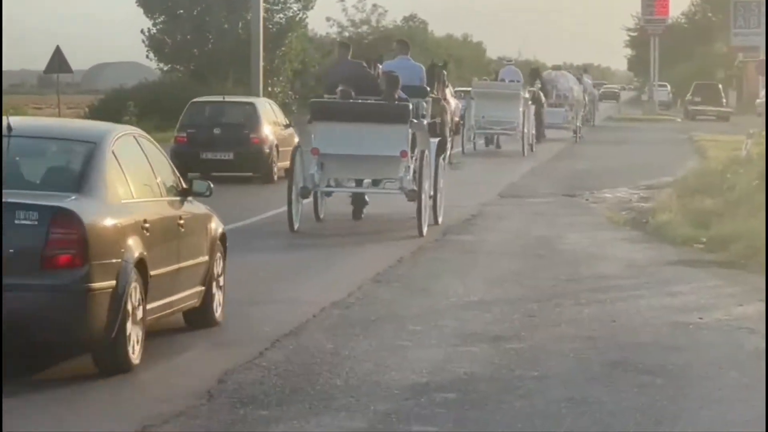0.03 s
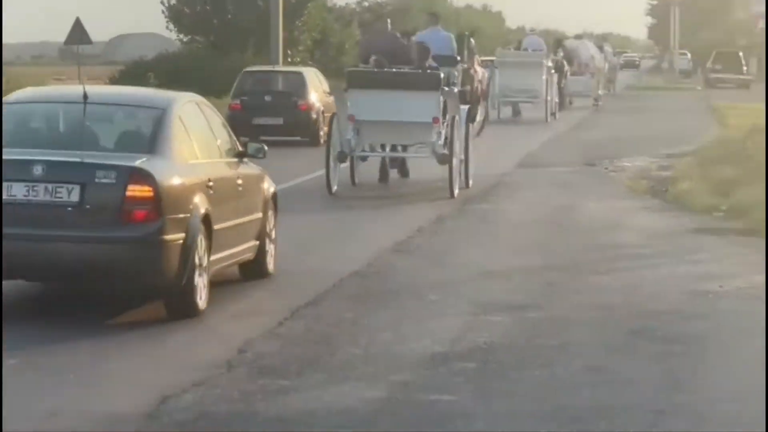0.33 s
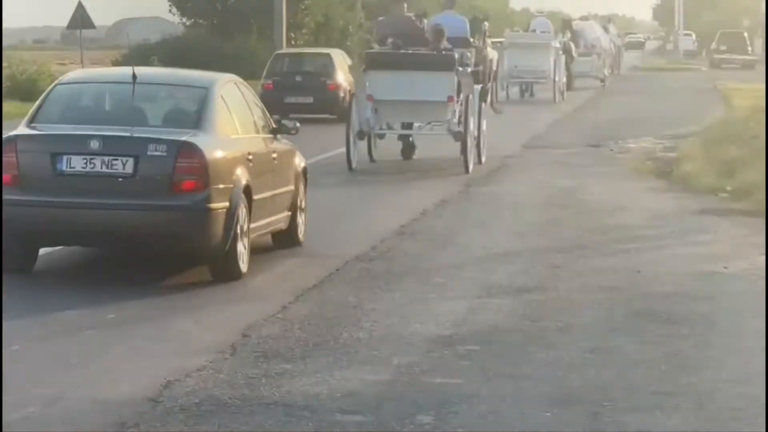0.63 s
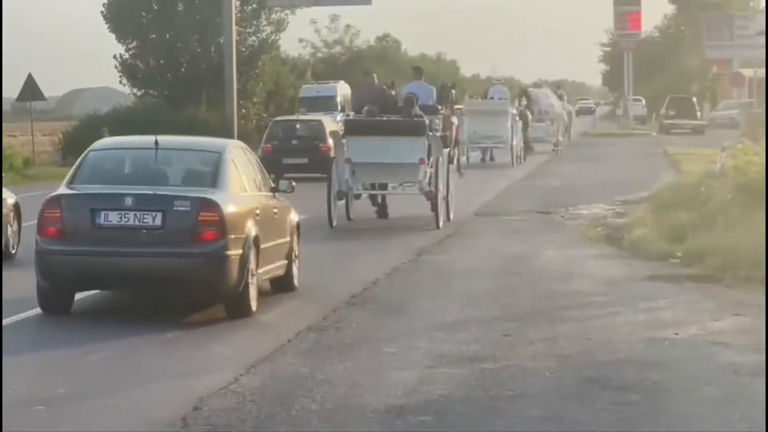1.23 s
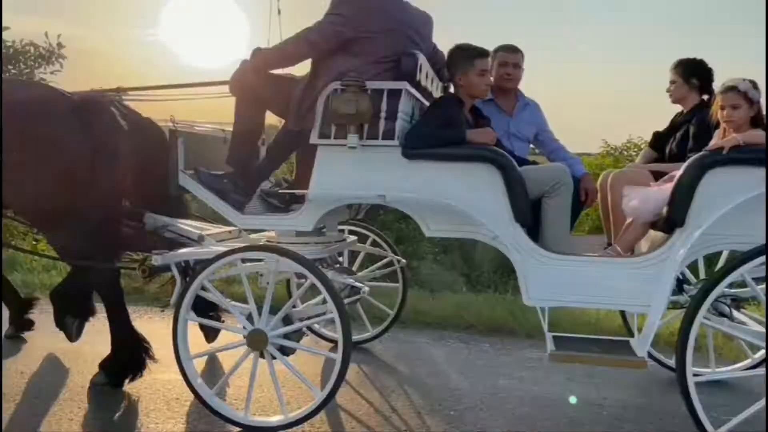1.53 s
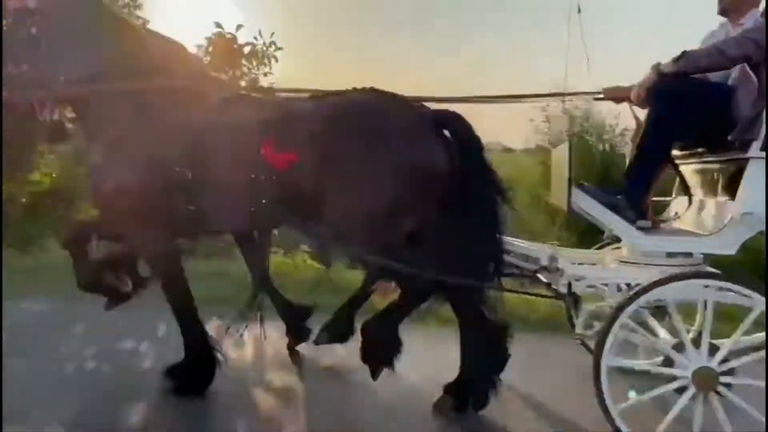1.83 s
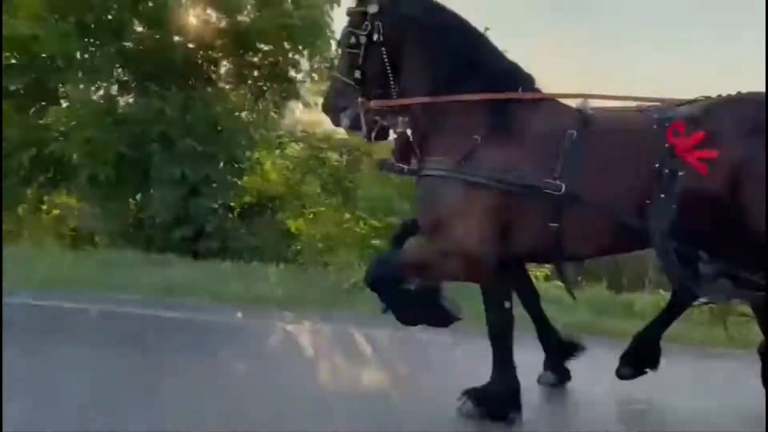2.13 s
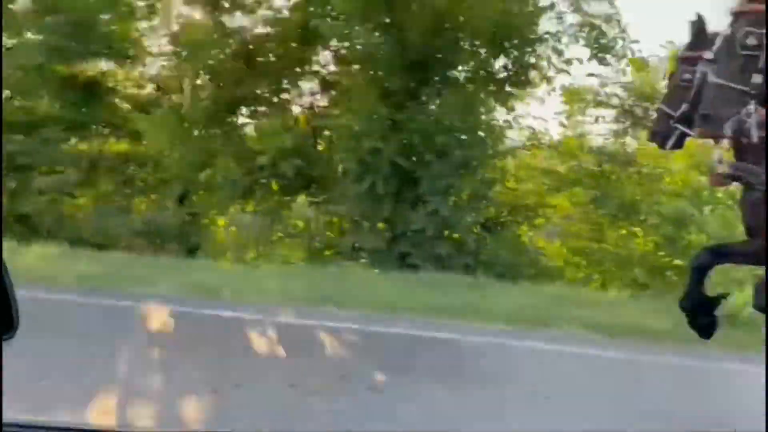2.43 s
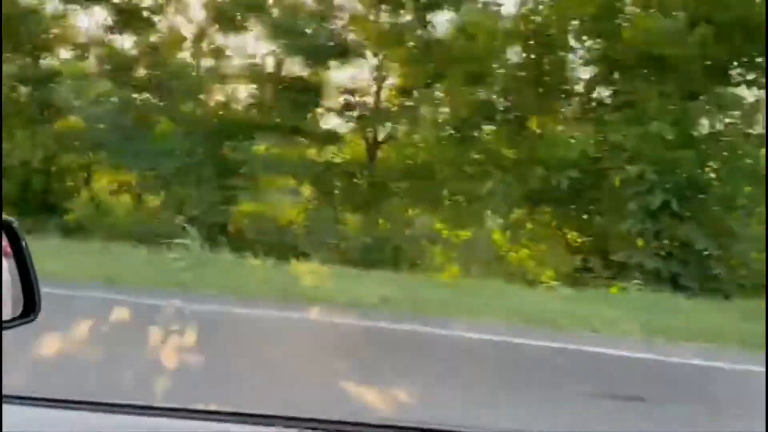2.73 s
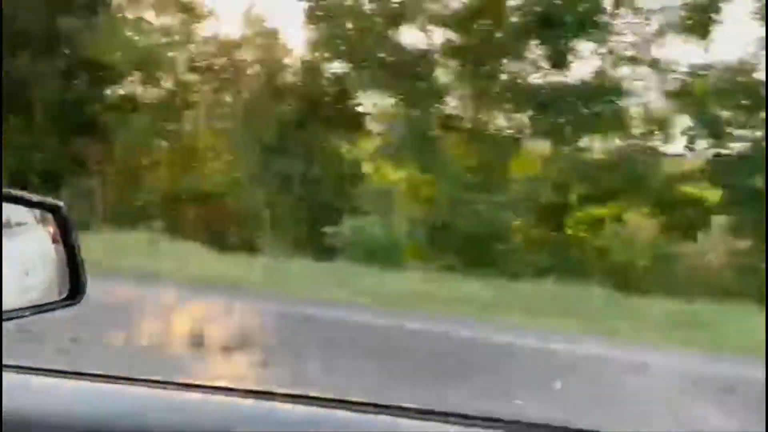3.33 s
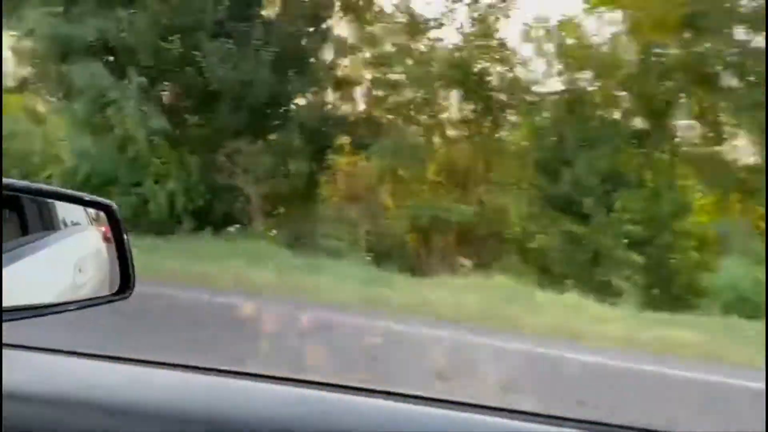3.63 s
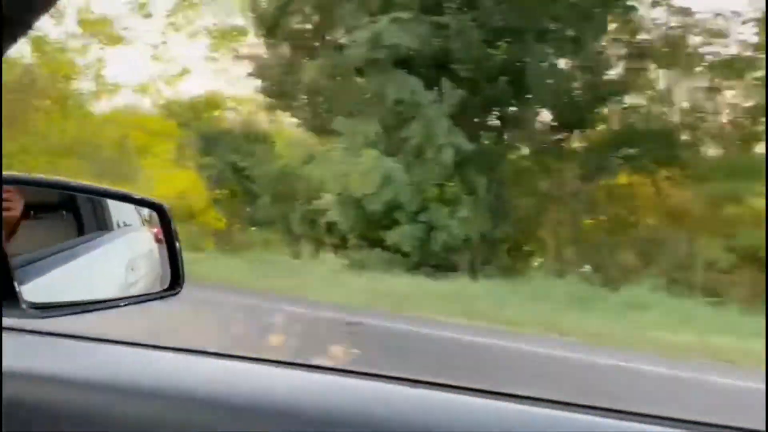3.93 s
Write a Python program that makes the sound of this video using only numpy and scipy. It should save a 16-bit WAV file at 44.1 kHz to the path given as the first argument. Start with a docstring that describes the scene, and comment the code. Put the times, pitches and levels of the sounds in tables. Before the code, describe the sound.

A horse's hooves clop past, heard over road and wind noise inside a moving car.

```python
"""Overtaking a carriage horse

Stereo microphones in a moving car, window open: tyre and wind noise over a booming cabin, horses far ahead.
After a short silent break the car passes a trotting horse, close on the left: hollow hooves clop, iron shoes
clink and scuff on grit, harness buckles jingle. As the horse drops behind, the car knocks over a road seam
and tyre noise swells once more."""
import sys
import numpy as np
from scipy import signal
from scipy.fft import rfft, irfft, next_fast_len
from scipy.io import wavfile
from scipy.ndimage import uniform_filter1d, map_coordinates

SR = 44100
rng = np.random.default_rng(int(sys.argv[2]) if len(sys.argv) > 2 else 0)


def to_wav(s):
    """Save 16-bit WAV."""
    ch = np.atleast_2d(s).T  # columns
    pcm = np.round(np.clip(ch, -1, 1) * 32767)  # PCM
    wavfile.write(sys.argv[1], SR, pcm.astype(np.int16))


N = 176400

LEFT_RIGHT = np.array([[1], [-1]])
IRON_KNOTS_PER_S = 920  # how fast the phase of a ringing shoe wanders
# wind rumble at the two microphones: (frequency [Hz], likeness [0-1])
RUMBLE_ALIKE = [(60, 1), (250, 0.73)]


def amp(db):
    """Decibels to gain."""
    return 10 ** (np.asarray(db) / 20)


def unit(x):
    """Scale to rms 1."""
    return x / np.sqrt(np.mean(x ** 2) + 1e-20)


def along(points, hz):
    """Read (frequency [Hz], value) points on a log axis."""
    f, v = np.transpose(points)
    return np.interp(np.log(hz + 1), np.log(f + 1), v)


def curve(rows):
    """Read (time [s], value) points at every sample."""
    return np.interp(np.arange(N) / SR, *np.transpose(rows))


def wobble(rate):
    """A smooth random curve, rate knots a second."""
    return map_coordinates(rng.standard_normal(int(N * rate / SR) + 4), [np.arange(N) * rate / SR])


def wander(t, rate):
    """Random drift over the times t, straight between rate knots a second."""
    return map_coordinates(rng.standard_normal(len(t)), [t * rate], order=1)


def filtered(x, response):
    """Filter x by a complex response of frequency."""
    m = next_fast_len(N + SR // 2)
    return irfft(rfft(x, m) * response(np.fft.rfftfreq(m, 1 / SR)), m)[..., :N]


def add(track, s, sound):
    """Mix a sound into a track at time s."""
    part = track[..., max(round(s * SR), 0):][..., :sound.shape[-1]]
    part += sound[..., :part.shape[-1]]


def lead(x, phases):
    """Turn left against right by a phase that depends on frequency."""
    return filtered(x, lambda hz: np.exp(.5j * along(phases, hz) * LEFT_RIGHT))


def rush(colour, alike, patchy_db):
    """Stereo noise of rms 1 with patches of random gain."""
    z = signal.stft(rng.standard_normal((2, N)), nperseg=512)[2]
    patches = uniform_filter1d(rng.standard_normal(z.shape[1:]), size=5, axis=0)
    patches = uniform_filter1d(patches, size=10, axis=1)
    pair = signal.istft(z * amp(patchy_db * unit(patches)), nperseg=512)[1][:, :N]
    turn = lambda hz: np.arccos(np.clip(along(alike, hz), -1, 1)) / 2
    mid, side = filtered(pair, lambda hz: amp(along(colour, hz)) * [np.cos(turn(hz)), np.sin(turn(hz))])
    return unit(np.array([mid + side, mid - side]))


def boom(hz, width_hz, evenness):
    """A cabin resonance driven by turbulence; evenness 0-1 steadies its level."""
    resonance = lambda f: 1 / (1 + ((f - hz) / width_hz) ** 2) * f / (f + hz)
    mid, side = signal.hilbert(filtered(rng.standard_normal((2, N)), resonance))
    steadied = mid.real / np.abs(mid) ** np.clip(evenness, 0, .9)
    return unit(steadied) + amp(-20.5) * unit(side.real) * LEFT_RIGHT


def car_behind():
    """Far behind the carriages: tyres, traffic roar, wind hiss and rumble at the window, cabin boom."""
    # the course of each noise: (time [s], level [dB])
    road_db = [(0, -30), (.15, -33.5), (.45, -31), (.75, -31), (1.05, -30), (1.3, -29.5), (1.52, -29)]
    roar_db = [(0, -51), (.6, -40), (.85, -37.5), (1.05, -33.5), (1.3, -30), (1.52, -36)]
    hiss_db = [(0, -45), (.5, -47.5), (1.52, -46.5)]
    rumble_db = [(0, -35), (.3, -32.5), (.5, -36.5), (.62, -29), (.8, -31.5), (.93, -30.5), (1.05, -28.5),
                 (1.25, -30), (1.52, -35)]
    boom_db = [(0, -29), (.668, -24.5), (.714, -33), (.786, -20.5), (.965, -32.5), (1.028, -23.5),
               (1.35, -34.5), (1.392, -23), (1.52, -28.5)]
    # their spectra: (frequency [Hz], density [dB])
    road_colour = [(150, -26), (320, -3.5), (500, -2), (700, -1), (1030, 1.5), (1500, -9), (2200, -15.5),
                   (3100, -18.5), (4200, -28.5), (7000, -27.5), (9500, -57), (11500, -39)]
    roar_colour = [(100, -20), (220, 0.5), (600, 2.5), (800, -6), (1400, -33), (3000, -71)]
    hiss_colour = [(800, -30), (2800, 0.5), (5000, -2.5), (7000, -3.5), (9000, -9), (11200, -1.5)]
    rumble_colour = [(30, -45.5), (70, 3.5), (100, 1), (130, -5), (160, 5), (190, -3), (240, 2.5),
                     (330, -11), (600, -48)]
    # outside noise at the two microphones: (frequency [Hz], likeness [0-1])
    alike = [(200, 0.95), (900, 0.72), (1400, 0.49), (2200, 1), (4000, 1), (11000, 0.85)]
    road = amp(curve(road_db) + 0.8 + 0.54 * wobble(13.9)) * rush(road_colour, alike, patchy_db=1)
    roar = amp(curve(roar_db)) * rush(roar_colour, alike, patchy_db=-1.5)
    hiss = amp(curve(hiss_db)) * rush(hiss_colour, alike, patchy_db=2.5)
    drone = amp(-6) * boom(hz=164.0, width_hz=22, evenness=0.36)
    rumble = amp(curve(rumble_db)) * (rush(rumble_colour, RUMBLE_ALIKE, patchy_db=2.0) + drone)
    low = amp(curve(boom_db)) * boom(hz=48.44, width_hz=7.3, evenness=1.0)
    return road + roar + hiss + rumble + low


def clinks():
    """An iron shoe meets the road and rings briefly; the point of contact picks an extra ring."""
    # shoe strikes: (time [s], level [dB], t60 [s], contact ring [Hz])
    strikes = [(.012, -32, 0.088, 4230), (1.696, -19.5, 0.023, 5070), (1.722, -22.5, .025, 5300),
               (1.758, -21, 0.032, 4050), (2.0059, -15.5, 0.022, 4200), (2.0658, -16, 0.014, 2380),
               (2.0665, -18.5, 0.015, 5350), (2.1574, -13.5, 0.012, 3000), (2.1588, -26, 0.033, 7800),
               (2.338, -26.5, 0.048, 4160), (2.3944, -17, 0.011, 5100), (2.483, -23, .012, 3560),
               (2.7213, -21, 0.013, 4860), (2.7255, -24, 0.015, 7120)]
    # modes of the shoe: (frequency [Hz], level [dB])
    shoe = [(2450, -7), (3900, -6), (5250, -13), (6600, -16), (7900, 3)]
    out, t = np.zeros(N), np.arange(SR // 6) / SR
    tone = lambda hz: np.sin(2 * np.pi * hz * t + 0.8 * wander(t, IRON_KNOTS_PER_S))
    attack = 1 - np.exp(-t / 0.00039)
    for s, db, t60, contact_hz in strikes:
        ring = sum(amp(level) * tone(hz * rng.normal(1, 0.012)) for hz, level in shoe)
        contact = amp(-3) * tone(contact_hz)
        grit = amp(-8.5) * rng.standard_normal(len(t))
        add(out, s, amp(db - 60 * t / t60) * (.5 * ring + contact + grit) * attack)
    return out


def clops():
    """Each blow rings the hollow hoof while it presses down, with a short click and crack of the shoe."""
    # hoof blows: (time [s], level [dB], pitch [Hz], hold [s], t60 [s], click over clop [dB], crack [Hz])
    blows = [(.217, -17.5, 820, 0.0038, 0.021, -19.5, 2420), (.558, -23.5, 840, 0.0032, 0.026, -19.5, 2420),
             (.865, -18.5, 822, 0.005, .028, -25, 2420), (1.186, -22, 850, 0.0046, 0.022, -20.5, 2440),
             (1.7235, -18.5, 940, .009, .02, -11, 5240), (1.7565, -18.5, 800, 0.0062, 0.041, -2, 2010),
             (1.7935, -9.5, 800, 0.0023, 0.036, -16.5, 2100), (1.813, -14.5, 783, 0.0018, .05, -20, 2400),
             (1.838, -20, 750, 0.0019, .035, -5, 2130), (2.0325, -14, 860, 0.0019, 0.0078, -18, 1480),
             (2.0712, -14.5, 800, 0.0016, 0.018, -5, 2370), (2.1592, -6, 882, 0.0023, 0.015, -16.5, 3010),
             (2.367, -19, 962, 0.0018, .049, -14, 2700), (2.3954, -11.5, 830, 0.0052, 0.012, -5.5, 2000),
             (2.45, -24, 850, .002, .035, -4.5, 3120), (2.46, -20, 832, .003, 0.074, -13, 3250),
             (2.488, -22, 800, 0.0036, 0.045, -15, 2920), (2.679, -27.5, 740, 0.0025, .02, -5.5, 1970),
             (2.7215, -18, 777, 0.004, 0.021, -3.5, 3020), (2.824, -16.5, 832, 0.0008, 0.044, -14, 3400),
             (3.024, -26, 810, 0.0013, 0.022, -16, 2430), (3.05, -28, 820, .003, 0.07, -6, 2400),
             (3.144, -27.5, 800, .003, 0.085, -12, 2390), (3.379, -35, 800, 0.0018, .015, -7, 2980)]
    # modes of the hollow hoof: (multiple of pitch, level [dB], share of t60)
    hoof = [(1, 2, 0.75), (.6, -16, 0.94), (.84, -15, 0.89), (1.13, -7.5, 0.97), (1.44, -13, 0.68),
            (2.6, -42.5, 0.41)]
    # iron on asphalt: (frequency [Hz], density [dB])
    click_colour = [(300, -11), (650, 4.5), (1150, 10.5), (1600, 4), (2100, 8.5), (2700, 4.5), (3500, -0.5),
                    (5000, -3.5), (6500, -13), (8000, 4), (11500, -8.5)]
    crack_t60_s, click_t60_s = 0.038, 0.027
    ring, clicks, t = np.zeros(N), np.zeros(N), np.arange(SR // 8) / SR
    attack = 1 - np.exp(-t / 0.00068)
    scatter = rng.standard_normal((len(blows), len(hoof), 2))
    for (s, db, hz, hold, t60, click_db, crack_hz), chance in zip(blows, scatter):
        rock = 0.37 * wander(t, 400)  # the phase drifts as the hoof rocks
        fall_db = 60 * np.maximum(t - hold, 0) / t60
        modes = 0
        for (k, level, share), draw in zip(hoof, chance):
            louder, sharper = draw * (k != 1)  # the main mode keeps its level and pitch
            phase = 2 * np.pi * hz * k * (1 + 0.034 * sharper) * t + k * rock
            modes += amp(level + 2 * louder - fall_db / share) * np.sin(phase)
        crack_phase = 2 * np.pi * crack_hz * t + 0.77 * wander(t, IRON_KNOTS_PER_S)
        crack = amp(click_db - 4.5 - 60 * t / crack_t60_s) * np.sin(crack_phase)
        add(ring, s, amp(db) * (modes + crack) * attack)
        add(clicks, s - .0005, amp(db + click_db - 60 * t / click_t60_s))
    return ring + clicks * rush(click_colour, [(1000, 0.37)], patchy_db=3.5)


def scuffs():
    """Grit crunches under a sliding hoof."""
    # hooves sliding and lifting: (time [s], length [s], level [dB])
    slides = [(0.666, 0.016, -36), (1.704, 0.082, -35.5), (2.005, 0.053, -35), (2.096, 0.077, -31.5),
              (2.33, 0.1, -35), (2.445, 0.093, -33), (2.642, 0.063, -41.5), (2.708, 0.12, -43.5),
              (2.792, 0.074, -39), (3.016, 0.069, -41.5), (3.123, 0.11, -38), (3.366, .06, -36.5)]
    # crunching grit: (frequency [Hz], density [dB])
    grit_colour = [(300, -8), (600, 2.5), (1050, 11.5), (1580, -1), (2050, -0.5), (3000, 1), (4500, -4),
                   (6000, -6.5), (8000, -15), (11500, -18.5)]
    pressure = np.zeros(N)
    for s, length, db in slides:
        progress = np.linspace(0, 1, int(length * SR))
        add(pressure, s, amp(db) * np.abs(np.sin(np.pi * progress ** 0.49)))
    return pressure * unit(amp(2.9 * wobble(450)) * rush(grit_colour, [(1000, 0.48)], patchy_db=4.5))


def car_beside():
    """Alongside the horse: less road noise, wind at the window and a higher throb in the cabin."""
    # the course of each noise: (time [s], level [dB])
    road_db = [(1.63, -37.5), (1.95, -38.5), (2.25, -39), (2.6, -38.5), (2.95, -37), (3.3, -33), (3.6, -37),
               (3.8, -35), (4, -35)]
    rumble_db = [(1.63, -35), (2.05, -33.5), (2.35, -33), (2.7, -37), (3, -36), (3.2, -32.5), (3.6, -36),
                 (4, -33.5)]
    boom_db = [(1.63, -41), (1.8, -30), (2, -36), (2.4, -33), (2.62, -27), (2.75, -38), (2.98, -34),
               (3.07, -27), (3.3, -31), (4, -32.5)]
    throb_db = [(1.63, -29.5), (1.68, -23.5), (1.75, -35.5), (1.81, -32), (2.24, -26.5), (2.44, -37.5),
                (2.52, -24.5), (2.69, -40), (2.75, -19), (2.86, -36), (2.89, -29), (4, -27.5)]
    # spectra of tyres and wind: (frequency [Hz], density [dB])
    road_colour = [(150, -8.5), (320, 1.5), (440, 5.5), (540, -3.5), (780, 0.5), (1200, -3), (1600, -6.5),
                   (1900, -8), (2300, -13), (3200, -17), (4500, -25.5), (6500, -27.5), (9000, -50),
                   (11500, -31)]
    rumble_colour = [(60, -11.5), (130, 3), (180, -4.5), (240, -4), (320, -18), (600, -44)]
    # road noise at the two microphones: (frequency [Hz], likeness [0-1])
    alike = [(200, 1), (500, 0.66), (900, 0.15), (2000, 0.11), (5000, 0.46), (8000, 0.7)]
    road = amp(curve(road_db) + 0.86 * wobble(11)) * rush(road_colour, alike, patchy_db=2.5)
    gusts = amp(curve(rumble_db) + 1.0 + 0.44 * wobble(16))
    rumble = gusts * rush(rumble_colour, RUMBLE_ALIKE, patchy_db=2.5)
    low = amp(curve(boom_db) - 0.5) * boom(hz=45.8, width_hz=10.6, evenness=0.44)
    throb = amp(curve(throb_db) - 0.14) * boom(hz=88.8, width_hz=16.4, evenness=0.53)
    return road + rumble + low + throb


def jingles():
    """Small buckles on the harness ring as the horse moves, close to the window."""
    # shakes of the harness: (time [s], level [dB])
    shakes = [(1.671, -29.5), (1.912, -32), (2.02, -33), (2.276, -40.5), (2.3, -33.5)]
    # modes of a buckle: (frequency [Hz], level [dB])
    buckle = [(8300, 1), (9300, 6.5), (10400, -10), (11500, -2.5)]
    t60_s, rattle_share = 0.086, 0.66
    out, t = np.zeros(N), np.arange(SR // 8) / SR
    attack = 1 - np.exp(-t / 0.001)
    for s, db in shakes:
        ring = sum(amp(level) * np.sin(2 * np.pi * hz * rng.normal(1, 0.0082) * t) for hz, level in buckle)
        add(out, s, amp(db - 60 * t / t60_s) * unit(ring) * attack)
    return out * amp(4.2 * wobble(500) + 5.0) * (1 - rattle_share + rattle_share * wobble(1700))


def skid():
    """The nearest shoe chatters along the asphalt and shakes the resonances of hoof and iron."""
    # the slide under load: (time [s], level [dB])
    slide = [(1.77, -57), (1.786, -28.5), (1.797, -21), (1.815, -24), (1.838, -30.5), (1.88, -51)]
    # resonances of hoof and iron: (frequency [Hz], width [Hz], level [dB])
    modes = [(570, 91, -0.5), (785, 200, 3), (1114, 70, -4), (2120, 380, -9.5), (3000, 610, -16),
             (4250, 600, -14.5), (5170, 480, -17.5), (7000, 1300, -24.5)]
    chatter = amp(3 * wobble(450)) * rush([(1000, 0)], [(1000, 0.68)], patchy_db=0)
    body = lambda f: sum(amp(db) / (1 + ((f - hz) / width) ** 2) ** 2 for hz, width, db in modes)
    t = np.arange(N) / SR
    sliding = (t > slide[0][0]) * (t < slide[-1][0])
    return amp(curve(slide)) * sliding * unit(filtered(chatter, body))


def bump(at_s=3.104, db=-13, hz=206, t60_s=0.039):
    """One dull knock of the suspension as the car rides over a seam."""
    out, t = np.zeros(N), np.arange(SR // 6) / SR
    attack = 1 - np.exp(-t / 0.0041)
    add(out, at_s, amp(db - 60 * t / t60_s) * np.sin(2 * np.pi * hz * t) * attack)
    return out


def swell(peak_s=3.33, width_s=0.18, centre_hz=1275, octaves_per_s=-1.2):
    """A band of tyre noise goes by, right of centre: it rises, sinks in pitch and fades."""
    t = np.arange(N) / SR - peak_s
    hz = centre_hz * 2 ** (octaves_per_s * np.clip(t, -.5, .5))
    band = rush([(20, 11), (200, -2.5), (450, 2), (900, -19), (2500, -61)], [(1000, 0.45)], patchy_db=1.5)
    noise = unit(band * np.cos(2 * np.pi * np.cumsum(hz) / SR))
    return noise * amp(-36 - 2.1 * LEFT_RIGHT) / (1 + (t / width_s) ** 2)


def cabin(x):
    """Short reflections from the car's interior around the microphones."""
    # the cabin's decay: (frequency [Hz], t60 [s])
    decay = [(200, 0.1), (900, 0.11), (3000, 0.11), (10000, 0.2)]
    hz, t, z = signal.stft(rng.standard_normal((2, SR // 4)), SR, nperseg=256)
    tail = signal.istft(z * amp(-60 * t / along(decay, hz)[:, None]), SR, nperseg=256)[1]
    tail = np.pad(tail / np.linalg.norm(tail[0]), ((0, 0), (SR // 400, 0)))
    return signal.fftconvolve(x, tail, axes=1)[:, :N]


def scene():
    """From inside the car: the horses far ahead, a silent break, then one close on the left."""
    # the horse's place between the microphones: (time [s], left over right [dB])
    pan = [(1.2, 0.5), (1.75, .5), (2.15, 2.5), (2.75, 1)]
    # sound arriving from the side: (frequency [Hz], left phase lead [rad])
    sideways = [(300, -1), (850, 0.53), (1700, 2.5), (2300, 1), (3500, 1.5), (8000, 1.5)]
    break_start_s, break_end_s, fade_s = 1.538, 1.627, .004
    t = np.arange(N) / SR
    before, after = np.clip([(break_start_s - t) / fade_s, (t - break_end_s) / fade_s], 0, 1)
    horse = (clops() + clinks() + scuffs() + skid() + jingles()) * amp(curve(pan) * LEFT_RIGHT / 2)
    horse = horse + amp(-7.5) * cabin(horse)
    behind = car_behind() + horse
    beside = car_beside() + bump() + swell() + lead(horse, sideways)
    return before * behind + after * beside


def record(dry):
    """The microphone pair shifts phase and level between the sides and keeps nothing above its band."""
    # phase between the microphones: (frequency [Hz], left lead [rad])
    phases = [(150, 0), (600, 0.95), (1080, 1), (1600, 0), (5300, 0), (5850, -1.8), (6500, -8), (7200, 2),
              (7600, -6), (9900, -15.5), (11000, -5), (12000, -8)]
    # what both share, cancelling near 9 kHz: (frequency [Hz], gain [dB])
    shared = [(7200, 0.5), (8000, -24.5), (9700, -25), (10700, -5), (12000, -8)]
    # balance of the pair: (frequency [Hz], left over right [dB])
    balance = [(120, -0.6), (350, 1), (700, 2), (1400, -0.5), (5000, 0.5), (9000, -2), (11500, 0.5)]
    top_hz = 11900
    pair = lead(dry, phases)
    mid = pair.mean(axis=0)
    pair = pair - mid + filtered(mid, lambda hz: amp(along(shared, hz)))
    pair = filtered(pair, lambda hz: amp(along(balance, hz) * LEFT_RIGHT / 2))
    return filtered(pair, lambda hz: 1 / (1 + (hz / top_hz) ** 80))


dry = scene()
out = record(dry)
to_wav(out)
```